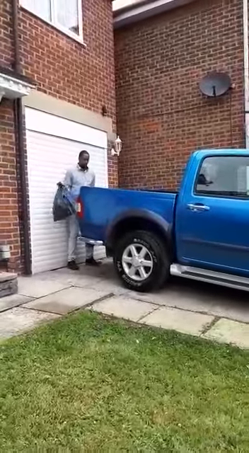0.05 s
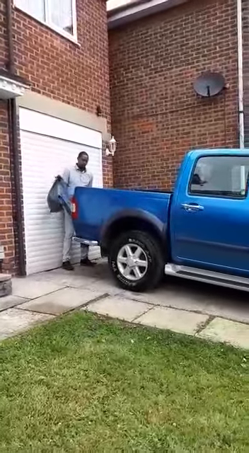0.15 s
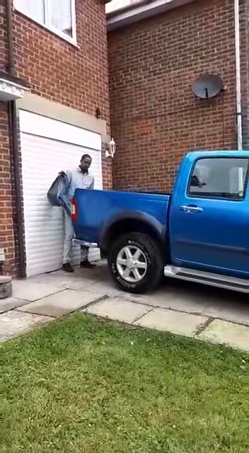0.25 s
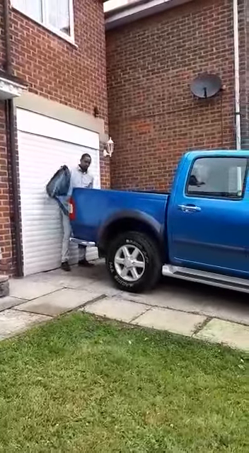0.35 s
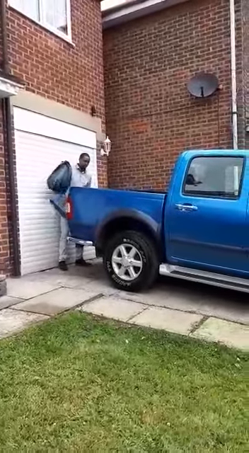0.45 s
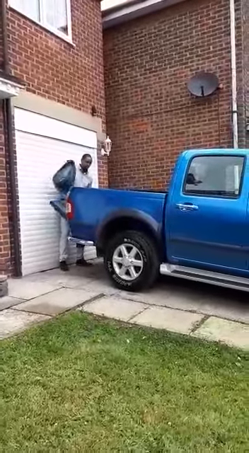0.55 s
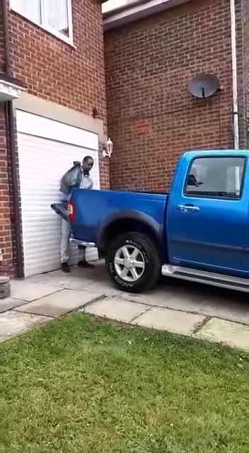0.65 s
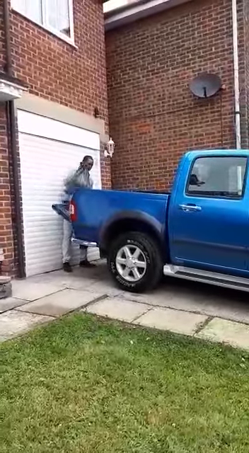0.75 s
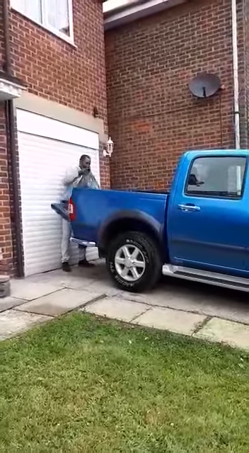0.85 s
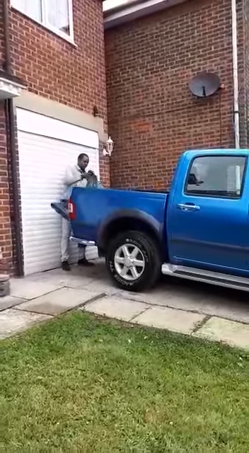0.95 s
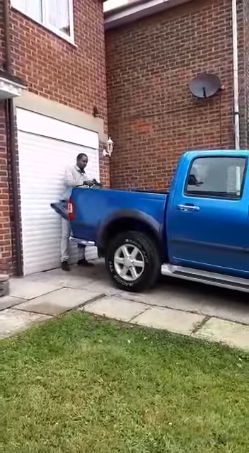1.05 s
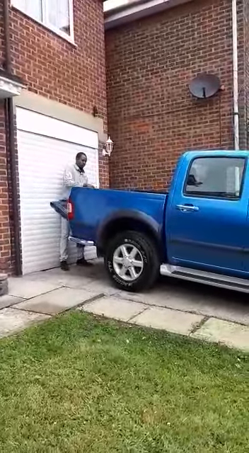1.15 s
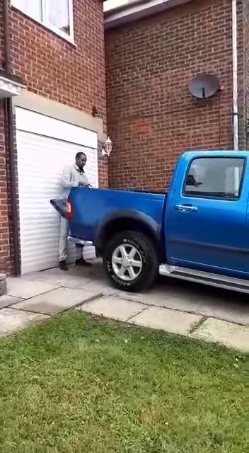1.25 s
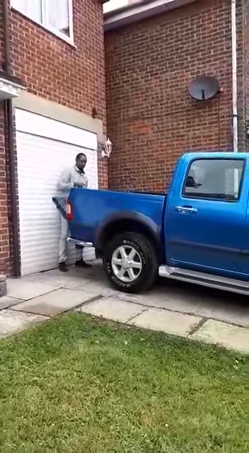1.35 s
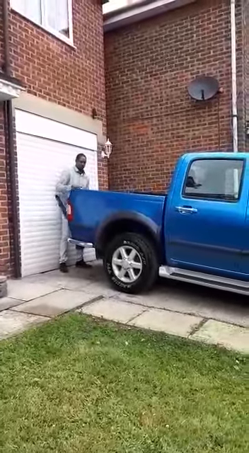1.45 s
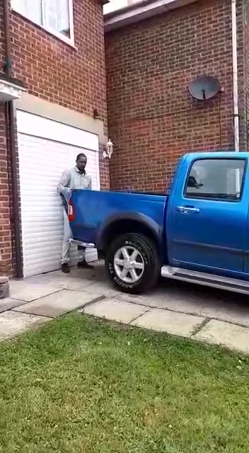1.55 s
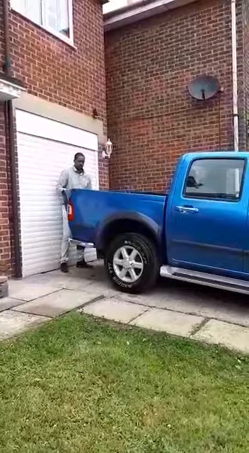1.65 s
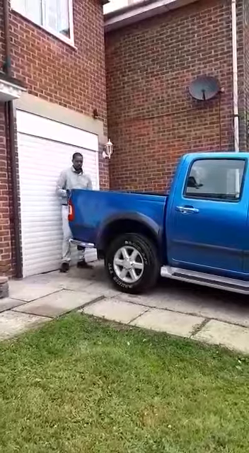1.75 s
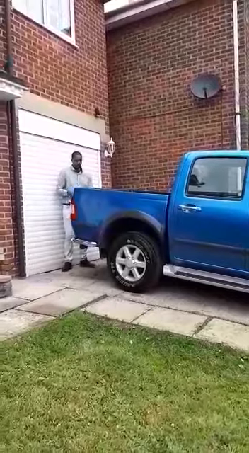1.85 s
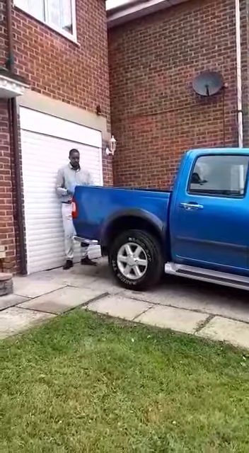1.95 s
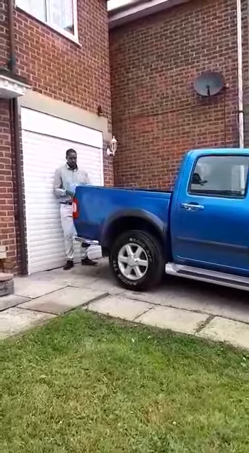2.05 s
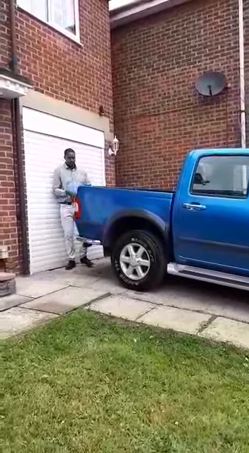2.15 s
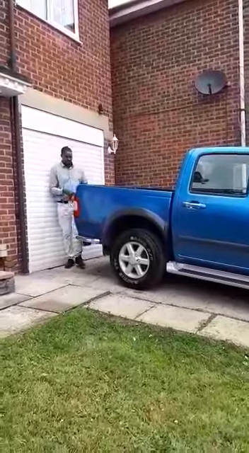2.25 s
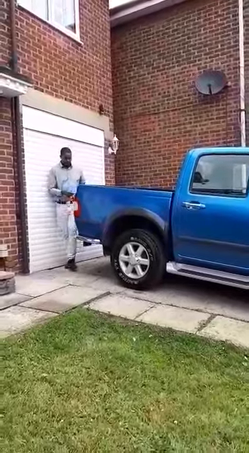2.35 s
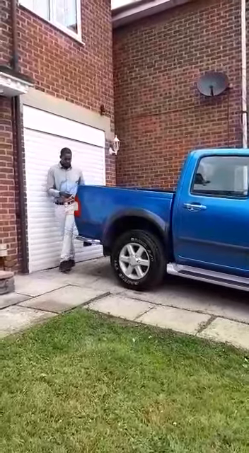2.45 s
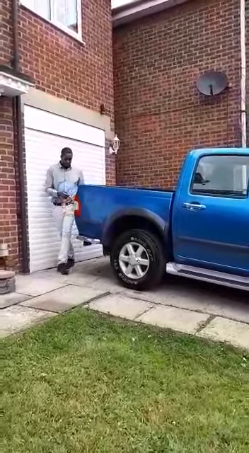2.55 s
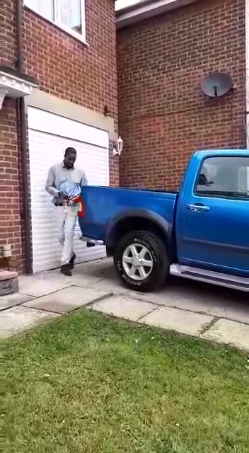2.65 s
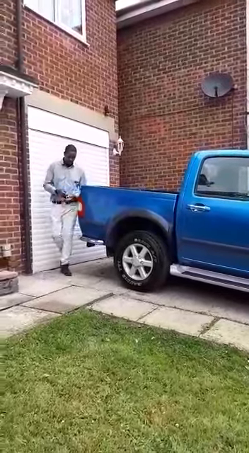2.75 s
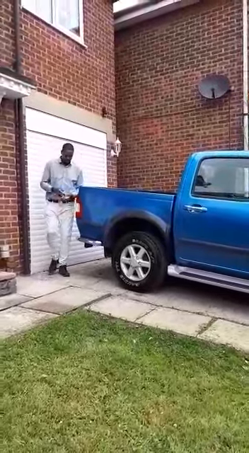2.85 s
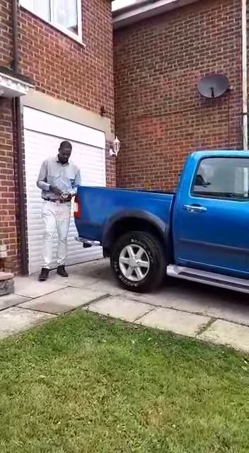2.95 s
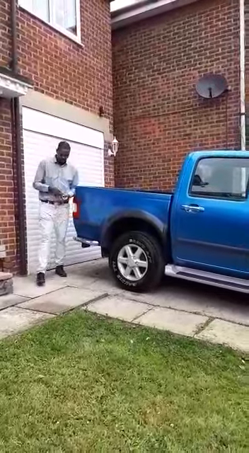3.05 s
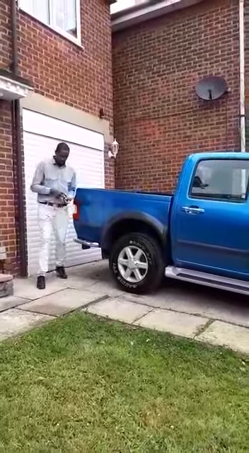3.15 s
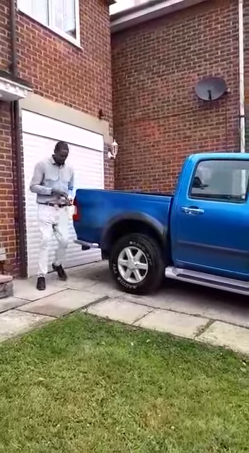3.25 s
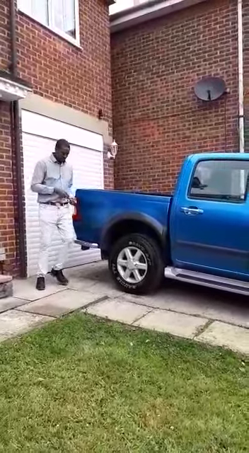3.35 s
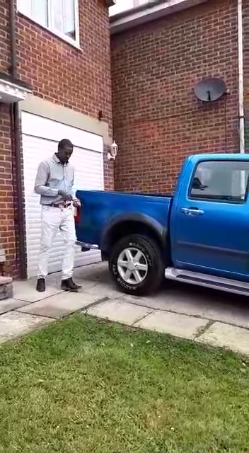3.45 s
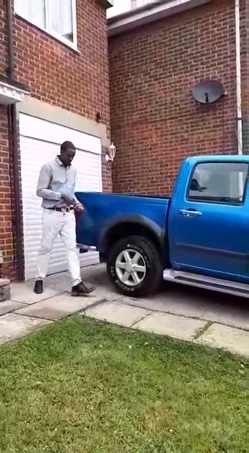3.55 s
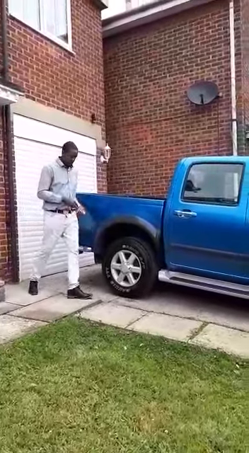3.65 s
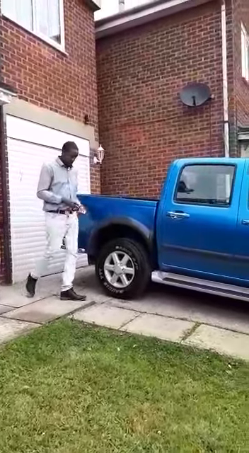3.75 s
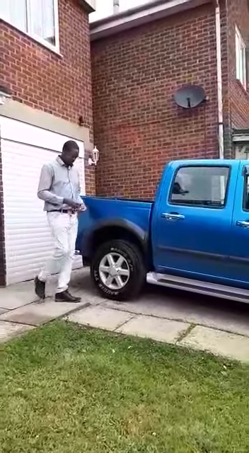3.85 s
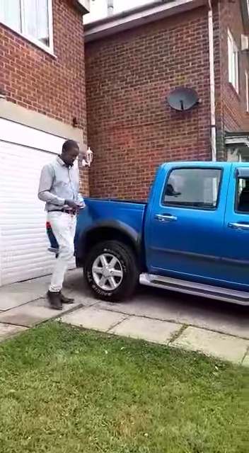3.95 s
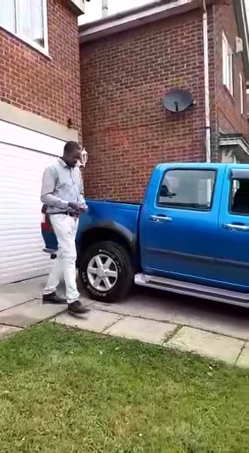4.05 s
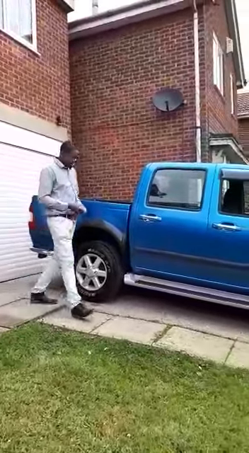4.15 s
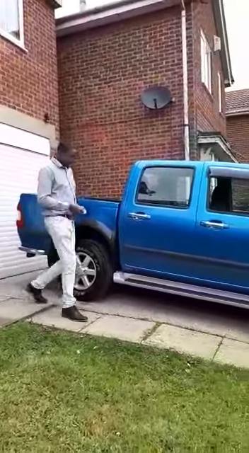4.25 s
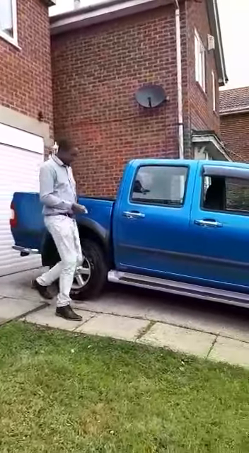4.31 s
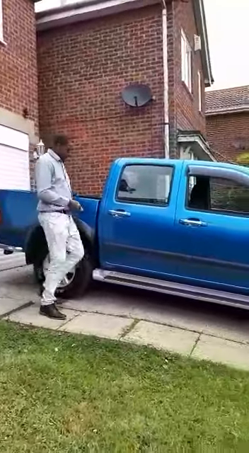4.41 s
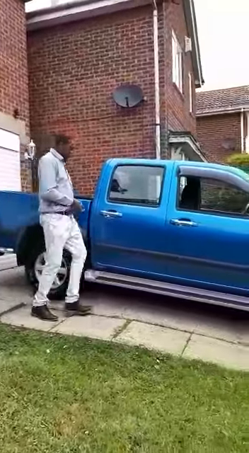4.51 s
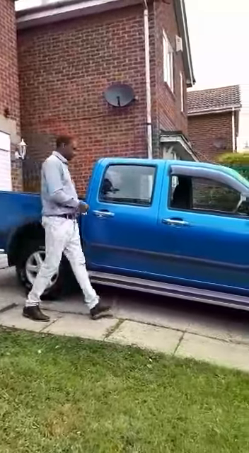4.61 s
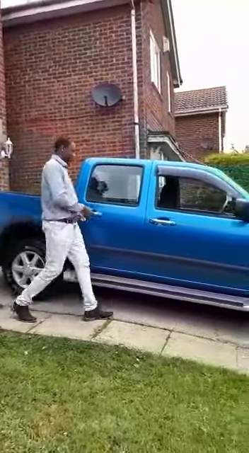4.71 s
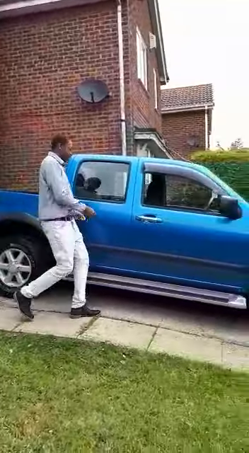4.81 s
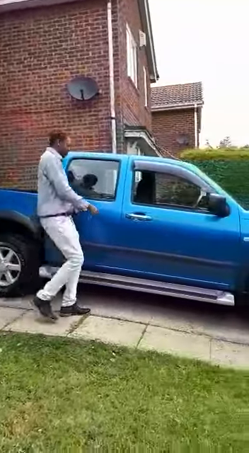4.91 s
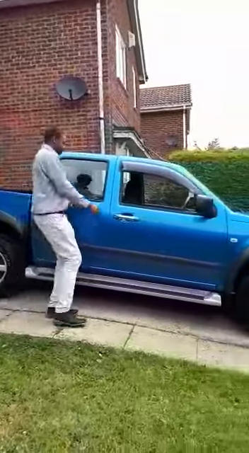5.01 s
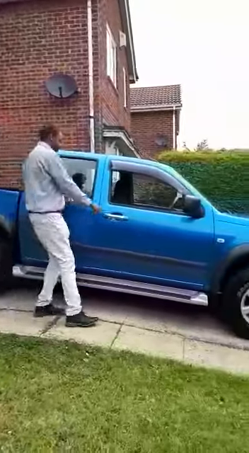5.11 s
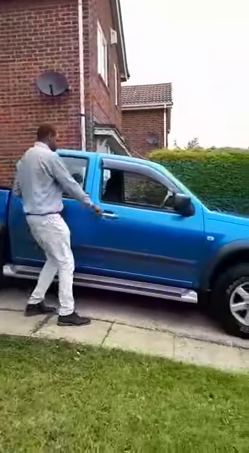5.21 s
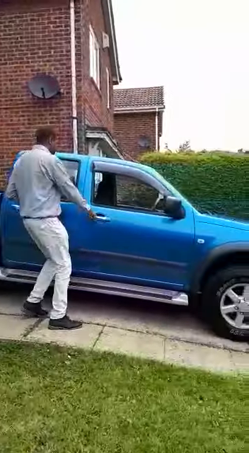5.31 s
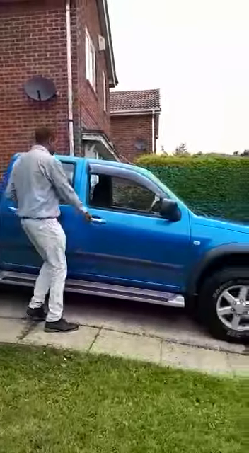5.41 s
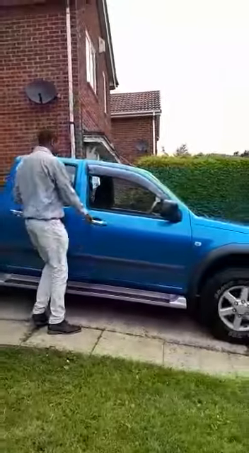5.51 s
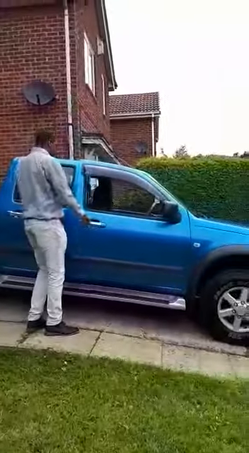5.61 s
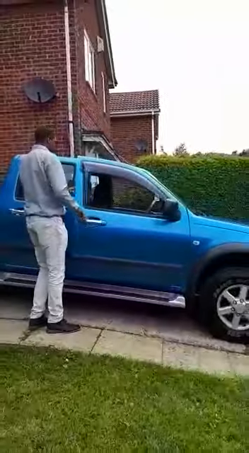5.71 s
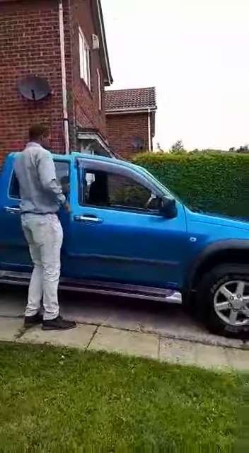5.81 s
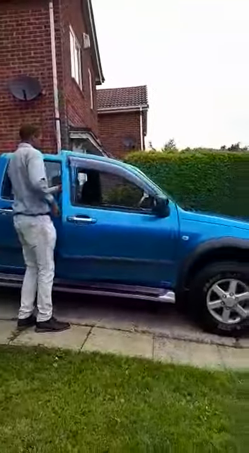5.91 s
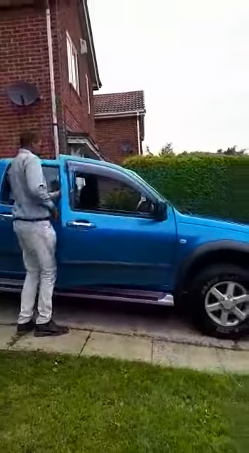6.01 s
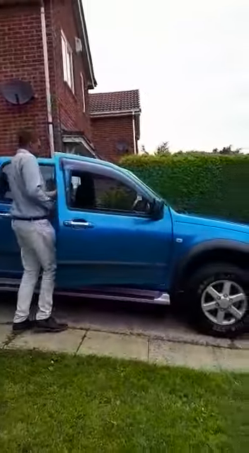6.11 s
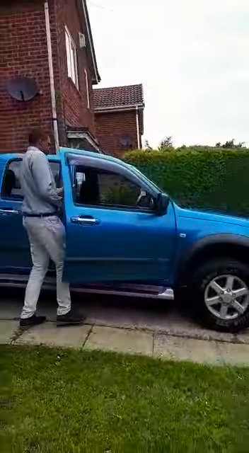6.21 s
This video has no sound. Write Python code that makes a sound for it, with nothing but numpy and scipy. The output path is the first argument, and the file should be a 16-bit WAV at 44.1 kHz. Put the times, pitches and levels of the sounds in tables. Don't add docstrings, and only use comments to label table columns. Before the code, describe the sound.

Crackling plastic and small metal knocks come first, followed by loose clanking straps and one heavy double-edged tailgate slam, by far the loudest sound, echoing briefly off brick. Quiet afterwards: light bright key jingles, gritty shoe scuffs, fluting bird whistles and a quick high trill. A heel taps stone, a sole creaks, and a vehicle door is unlatched with dull clunks. Distant road roar and faint leaves surround it, captured outdoors in stereo on a phone.

```python
import sys
import numpy as np
from scipy import signal
from scipy.fft import rfft, irfft
from scipy.io import wavfile
from scipy.ndimage import uniform_filter1d

SR = 44100
rng = np.random.default_rng(int(sys.argv[2]) if len(sys.argv) > 2 else 0)


def invert_db(x):
    u = np.asarray(x, float) / 20
    return 10 ** u


def to_wav(sig):
    pcm = np.clip(np.atleast_2d(sig), -1, 1) * 32767
    pcm = np.round(pcm).astype(np.int16)
    wavfile.write(sys.argv[1], SR, pcm.T)


N = 276507
TIME = np.arange(N) / SR
HZ = np.maximum(np.fft.rfftfreq(N, 1 / SR), 1)


def on_log(table, hz):
    f, v = np.transpose(table)
    return np.interp(np.log(hz), np.log(f), v)


def unit(x):
    return x / np.sqrt(np.mean(x ** 2))


def colour(x, gain):
    return irfft(rfft(x) * gain, N)


def band(hz, width):
    return 1 / np.sqrt(1 + ((HZ - hz ** 2 / HZ) / width) ** 2)


def ring(x, hz, t60):
    r = np.exp(-np.log(1000) / (t60 * SR))
    swing = signal.lfilter([1], [1, -r * np.exp(2j * np.pi * hz / SR)], x).imag
    return np.sqrt(2 * (1 - r * r)) * swing


# frequency_hz, correlation [0..1]
PORT_LIKENESS = [(100, 0.95), (400, 0.95), (800, 0.75), (1500, .5), (3000, 0.14), (6000, 0.027)]


def pair(noise):
    c = on_log(PORT_LIKENESS, HZ)
    mid = colour(noise[0], np.sqrt((1 + c) / 2))
    side = colour(noise[1], np.sqrt((1 - c) / 2))
    return np.array([mid + side, mid - side])


def walk(rate):
    k = int(SR / rate)
    held = np.repeat(rng.standard_normal(N // k + 1), k)
    return 1.3 * uniform_filter1d(uniform_filter1d(held, k), k)[:N]


def bursts(s, db, length, rise):
    out = np.zeros(N)
    for start_s, level_db, fade_s in zip(s, db, length):
        i = int(start_s * SR)
        t = np.arange(min(N - i, SR // 2)) / SR
        out[i:i + len(t)] += invert_db(level_db) * (1 - np.exp(-t / rise)) * np.exp(-t / fade_s)
    return out


def grit(scatter_db):
    return unit(rng.standard_normal((2, N)) * invert_db(scatter_db * rng.exponential(size=N)))


def steel(blows, modes, clank_colour, rattle_colour, boom_db, shake_s, rattle_db, rattle_slope, wobble=1.79):
    s, clank_db, low_db, thud_hz = np.transpose(blows)
    length = np.full(len(s), shake_s)
    high_db = rattle_db + rattle_slope * (clank_db + 24.5)
    boom = 0
    for hz, db, t60 in modes:
        near_db = -7.6 * np.log2(hz / thud_hz) ** 2
        push = bursts(s, low_db + db + near_db, 0.39 * length, rise=0.0014)
        keep = np.exp(-np.log(1000) / (t60 * SR))
        swing = signal.lfilter([1 - keep], [1, -keep], push)
        upset = wobble * walk(45) + .0006 * hz * np.array([walk(30), walk(30)])
        boom = boom + swing * np.sin(2 * np.pi * hz * TIME + upset)
    clank = unit(colour(pair(grit(0.69)), invert_db(on_log(clank_colour, HZ))))
    clank = clank * bursts(s, clank_db - 5.5, length, rise=0.00016)
    rattle = unit(colour(pair(grit(1.64)), invert_db(on_log(rattle_colour, HZ))))
    rattle = rattle * bursts(s, high_db + 1.5, 0.94 * length, rise=0.004)
    return thin_deep_bass(invert_db(boom_db) * boom + clank + rattle)


def thin_deep_bass(x):
    return colour(x, 1 / (1 + (62 / HZ) ** 4))


# start_s, clank_db, boom_db, thud_hz
SLAM_BLOWS = [(1.951, -15.5, -20.5, 226), (1.958, -10, -24, 428), (1.972, -15.5, -14, 272),
              (1.989, -17.5, -21.5, 296), (1.995, -16, -11.5, 230), (2.009, -11, -19, 216),
              (2.025, -26.5, -12, 226), (2.045, -17, -29, 161), (2.076, -26, -17, 286),
              (2.06, -24, -23.5, 480), (2.112, -22.5, -26, 240), (2.15, -30, -43, 170),
              (2.17, -32, -32, 220), (2.195, -32, -29.5, 198), (2.217, -36.5, -31.5, 163),
              (2.277, -43, -33.5, 415), (2.347, -63.5, -40, 151)]
# pitch_hz, level_db, t60_s
SLAM_MODES = [(82.6, 6, 0.15), (133.8, -1.5, .12), (170, -1, 0.119), (197.3, -3.5, 0.21),
              (234.5, -1.5, 0.074), (279.5, -6, 0.11), (324.8, -8.5, 0.033), (354.8, -5, 0.094),
              (427.4, -4, 0.086), (429.3, -5, .1), (490.6, -6, 0.126), (577, -3.5, 0.0723)]
# frequency_hz, level_db [dB per Hz]
SLAM_CLANK = [(380, -10.5), (650, -5), (748, -6), (783, -5.5), (854, -3.5), (944, -3.5), (1070, -2.5),
              (1410, -0.5), (1610, -4), (2320, -18), (2430, -8.5), (2840, -15.5), (3200, -15), (4160, -42),
              (7040, -120)]
# frequency_hz, level_db [dB per Hz]
RATTLE_COLOUR = [(1470, -5), (2500, 1), (2830, -31.5), (3330, 0), (3950, -8.5), (4440, -4.5), (4800, -2.5),
                 (5440, -7.5), (7360, -3.5), (8600, -17.5), (9580, -16), (13900, -13.5), (16000, -24)]


def gate_slam():
    return steel(SLAM_BLOWS, SLAM_MODES, SLAM_CLANK, RATTLE_COLOUR, boom_db=9.2,
                 shake_s=0.02, rattle_db=-36.5, rattle_slope=1.09)


def dull_rattle_db():
    return [(hz, db - 7 * (hz > 8000)) for hz, db in RATTLE_COLOUR]


# start_s, clank_db, boom_db, thud_hz
LIFT_BLOWS = [(0.01, -62, -43, 200), (0.134, -28, -35, 458), (0.152, -33, -29, 390),
              (0.168, -38, -29.5, 410), (0.409, -63, -38.5, 199), (0.465, -41, -38.5, 199),
              (1.18, -29, -29.5, 417), (1.19, -33, -33, 149.8), (1.202, -26.5, -30, 248),
              (1.238, -30.5, -30.5, 458), (1.266, -20.5, -33.5, 491), (1.273, -24.5, -34.5, 460),
              (1.279, -23.5, -29.5, 440), (1.286, -17.5, -22.5, 467), (1.294, -30.5, -35, 412),
              (1.321, -41.5, -31, 406), (1.365, -42, -33.5, 414), (1.422, -37.5, -46.5, 237),
              (1.487, -30, -41, 485), (1.51, -37.5, -53, 409)]
# pitch_hz, level_db, t60_s
HANGING_MODES = [(196, -4.5, 0.18), (207, -2, .1), (248, -1.5, 0.13), (303.6, -5.5, 0.06), (359, -7.5, .08),
                 (411, -2.5, 0.079), (457.4, -5.5, 0.05), (505.5, -8, .07), (569, -9, 0.078)]
# frequency_hz, level_db [dB per Hz]
STRAP_CLANK = [(380, -38.5), (650, -11.5), (889, 0.5), (996, -4.5), (1170, -1), (1350, -10), (1480, -0.5),
               (2140, -18), (2320, -6), (3200, -15), (4160, -27.5), (7040, -120)]


def gate_lift():
    return steel(LIFT_BLOWS, HANGING_MODES, STRAP_CLANK, dull_rattle_db(), boom_db=9.8,
                 shake_s=0.018, rattle_db=-34, rattle_slope=1.67)


# start_s, clank_db, boom_db, thud_hz
DOOR_BLOWS = [(4.124, -42, -39, 302), (4.275, -55, -45, 326), (5.232, -54, -46, 318.5),
              (5.420, -26.5, -34.5, 250), (5.451, -23.5, -34.5, 300), (5.470, -29.5, -27, 233),
              (5.500, -34, -60, 200), (5.537, -34, -39, 452), (5.777, -28, -51, 319),
              (5.7935, -24.5, -34, 333), (5.803, -37, -41, 148), (5.817, -36.5, -35, 148)]
# pitch_hz, level_db, t60_s
DOOR_PANEL_MODES = [(94, -8, 0.088), (149, 6.5, 0.14), (151, -3, 0.031), (200, -0.5, 0.13),
                    (274.8, -2, 0.1), (320.8, -4.5, 0.024), (399.6, -7.5, 0.037), (442, -4, 0.11)]
# frequency_hz, level_db [dB per Hz]
LATCH_CLANK = [(380, -4), (650, -6), (943, -6), (1110, -10), (1280, -3.5), (1500, -10.5), (1660, -5),
               (1810, -11), (2860, -17.5), (4000, -27.5), (5200, -37), (8800, -120)]
# frequency_hz, level_db [dB per Hz]
HANDLE_RATTLE = [(1760, -25), (3000, -3), (5630, -8), (6440, -11), (7670, -9), (8880, -27), (9940, -25),
                 (16000, -39.5)]


def door_latch():
    return steel(DOOR_BLOWS, DOOR_PANEL_MODES, LATCH_CLANK, HANDLE_RATTLE, boom_db=9.9,
                 shake_s=0.012, rattle_db=-52, rattle_slope=1.4, wobble=1.0)


# start_s, level_db, pitch_hz, held_s, fade_s
SWINGS = [
    (4.1247, -30, 302, 0.0044, 0.006),
    (4.125, -34.5, 523, .003, 0.0043),
    (4.277, -38, 328, .003, .005),
    (5.234, -38, 320, .004, .006),
    (5.453, -27.5, 154.6, 0.022, 0.0081),
    (5.453, -31, 317, .024, 0.0065),
    (5.794, -28, 410, 0.0066, .003),
    (5.8005, -26.5, 154, .024, 0.0046),
    (5.8007, -38, 146, .02, .04),
    (5.801, -35, 298, 0.018, .008),
]


def thumps():
    out, t = np.zeros(N), np.arange(SR // 5) / SR
    for s, db, hz, held, fade in SWINGS:
        shape = np.exp(-np.maximum(t - held, 0) / fade)
        out[int(s * SR):int(s * SR) + len(t)] += invert_db(db) * shape * np.sin(2 * np.pi * hz * t)
    return thin_deep_bass(out)


# start_s, level_db, centre_hz, length_s
SCUFF_EVENTS = [(0.093, -47, 12000, .03), (.098, -36.5, 7140, 0.0098), (0.113, -43.5, 2450, .018),
                (.208, -60.5, 2540, 0.025), (0.32, -44.5, 2700, 0.024), (0.36, -43, 2400, 0.014),
                (0.51, -57.5, 6460, 0.021), (0.954, -68.5, 7000, 0.16), (0.49, -55.5, 2340, 0.15),
                (1.798, -63.5, 4730, 0.028), (2.664, -59, 6960, .009), (3.048, -52.5, 5400, 0.019),
                (3.13, -43, 2240, 0.013), (3.121, -49, 4200, 0.0056), (3, -56, 1900, 0.0051),
                (3.224, -50, 9000, .004), (3.239, -52, 10000, .004), (3.158, -53, 9300, .004),
                (3.015, -58.5, 4200, .006), (3.4, -60, 12000, .005), (3.3155, -45, 5400, 0.004),
                (3.3155, -49, 12500, 0.004), (5.42, -56.5, 7000, 0.016), (3.577, -46, 2630, 0.006),
                (3.627, -49, 2400, .006), (4.124, -53, 2470, 0.019), (4.1245, -58, 7600, 0.014),
                (.467, -45, 10000, .0015), (.467, -47, 2500, .002), (.335, -49.5, 2450, 0.025),
                (.35, -50, 3300, 0.018), (.513, -57, 6500, .003)]


def scuffs():
    out, noise = np.zeros((2, N)), pair(grit(1.8))
    broad = unit(colour(noise, invert_db(on_log(dull_rattle_db(), HZ) - 0.0)))
    for s, db, hz, length in SCUFF_EVENTS:
        i = slice(int(s * SR), int(s * SR) + SR // 2)
        peak = signal.iirpeak(hz, 2.5, fs=SR)
        narrow = signal.lfilter(*peak, signal.lfilter(*peak, noise[:, i]))
        crackle = unit(narrow) + invert_db(-0.5) * broad[:, i]
        out[:, i] += bursts([s], [db], [length], rise=0.000415)[i] * crackle
    return out


# start_s, level_db, pitch_hz
TICK_EVENTS = [(.081, -23, 6570), (.467, -35, 7300), (.467, -31, 11700), (2.118, -42, 12200),
               (2.221, -46, 6000), (2.222, -45.5, 12000), (4.769, -58, 5200), (4.787, -45, 5200),
               (4.787, -31.5, 1750), (4.7937, -44, 5170), (4.7935, -36.5, 1870), (4.7928, -46, 2660),
               (4.802, -38, 1200), (4.794, -51, 7800), (5.423, -49, 7700), (5.453, -31, 1300),
               (5.795, -37, 1500), (5.795, -39, 3000), (5.7955, -35, 6500), (5.7955, -45, 7500),
               (5.7955, -50, 9800), (5.992, -40, 2150)]


def ticks():
    out, t = np.zeros((2, N)), np.arange(SR // 20) / SR
    for (s, db, hz), turn in zip(TICK_EVENTS, rng.standard_normal((len(TICK_EVENTS), 2, 1))):
        rise = 1 - np.exp(-(t / 0.00066) ** 2)
        fade = np.exp(-np.log(1000) * t * hz / 27.4)
        tick = 2 * invert_db(db) * rise * fade * np.sin(2 * np.pi * hz * t + .6 * turn)
        out[:, int(s * SR):int(s * SR) + len(t)] += tick
    return out


# start_s, level_db
SOLE_SLIPS = [
    (4.6623, -66.5),
    (4.6664, -60),
    (4.6702, -63),
    (4.6738, -60.5),
    (4.6768, -59.5),
    (4.6795, -58.5),
    (4.682, -56.5),
]


def creak():
    slips, (s, db) = np.zeros(N), np.transpose(SOLE_SLIPS)
    slips[(s * SR).astype(int)] = invert_db(db)
    low = 4.5 * band(2460, 1240) ** 2
    middle = 0.5 * band(5610, 900) ** 2 + 0.5 * band(7300, 1200) ** 2
    high = band(11800, 2480) ** 2 + 1.3 * band(15000, 1980) ** 2
    return 20 * colour(slips, low + middle + high)


# start_s, level_db, loudest_ring_hz
KEY_TOUCHES = [(1.5794, -64, 7700), (1.6144, -62, 7700), (1.6512, -60, 8060), (1.7255, -60, 8010),
               (1.7799, -58.5, 7050), (2.8828, -60, 7900), (2.9955, -61.5, 7530), (3.014, -58.5, 10950),
               (3.032, -64, 13500), (3.0499, -51.5, 11200), (3.0556, -43, 13300), (3.066, -52, 14200),
               (3.085, -55.5, 11200), (3.1142, -57.5, 7130), (3.159, -46.5, 14100), (3.164, -54, 11100),
               (3.2246, -47, 7230), (3.239, -54, 12200), (3.275, -65, 7200), (3.2993, -56.5, 5740),
               (3.3159, -55, 13500), (3.3597, -59, 4860), (3.3862, -60, 7220), (3.400, -63, 14000),
               (3.5443, -54.5, 7820), (3.5803, -50, 7330), (3.605, -56, 9600), (3.6197, -54, 11200),
               (3.6394, -49, 14160)]
# pitch_hz, level_db
BUNCH_RINGS = [(5100, -13.5), (7450, -1), (8050, -8), (9500, -17.5), (11100, -10.5), (12200, -7),
               (13300, -17), (14300, -6)]


def keys():
    out, size, chatter = np.zeros((2, N)), SR // 6, grit(2.75)
    chance = rng.standard_normal((len(KEY_TOUCHES), 2, len(BUNCH_RINGS) + 1))
    for (s, db, loud_hz), (detune, uneven) in zip(KEY_TOUCHES, chance):
        hz, rel_db = np.transpose(list(BUNCH_RINGS) + [(loud_hz, 5)])
        i = slice(int(s * SR), int(s * SR) + size)
        shake = chatter[:, i] * bursts([s], [db], [0.012], rise=0.00037)[i]
        for f, g in zip(hz * (1 + .006 * detune), rel_db + 3.0 * uneven):
            out[:, i] += invert_db(g - 6) * ring(shake, f, .035)
        out[:, i] += invert_db(-9.5) * signal.lfilter(*signal.iirpeak(9000, .9, fs=SR), shake)
    return out


# start_s, length_s, start_hz, end_hz, level_db
THRUSH_NOTES = [
    (2.282, .08, 2060, 1984, -55),
    (2.38, 0.047, 2007, 2040, -49.5),
    (2.541, 0.091, 2063, 2554, -47),
    (2.597, 0.097, 2520, 2440, -52),
    (2.756, 0.12, 2202, 1917, -48.5),
    (2.879, 0.17, 1876, 1625, -55),
    (3.092, 0.062, 1674, 1580, -51.5),
    (3.24, 0.18, 2621, 2570, -51.5),
    (3.468, 0.045, 3150, 2990, -57),
    (3.5, 0.03, 2850, 2680, -55),
]
# flutter_hz, lower_sideband_db
THROAT_FLUTTER = [
    (100, -6.5),
    (130, -8.5),
    (185, -5.5),
]


def thrush():
    out, waver = np.zeros(N), walk(45)
    for s, length, hz0, hz1, db in THRUSH_NOTES:
        flutter_hz, flutter_db = THROAT_FLUTTER[np.searchsorted([2070, 2550], (hz0 + hz1) / 2)]
        u = np.clip((TIME - s) / length, 0, 1)
        edge = np.clip(np.minimum(u, 1 - u) * length / 0.014, 0, 1)
        hz = hz0 + (hz1 - hz0) * u ** (0.48 if hz1 > hz0 else 1.22)
        phase = 2 * np.pi * np.cumsum(hz * (1 + .0035 * waver)) / SR
        flutter = 2 * np.pi * np.cumsum(flutter_hz * (1 + .2 * walk(60))) / SR
        sidebands = np.sin(phase - flutter) + 0.37 * np.sin(phase + flutter)
        voice = np.sin(phase) + invert_db(flutter_db + 2.2 * walk(40.2)) * sidebands
        out += edge * invert_db(db + 3 + 2.8 * walk(70)) * voice
    return out


def sweeps(rows, rise=0.586, fall=1):
    out = np.zeros(N)
    for s, length, hz0, hz1, db in rows:
        u = np.linspace(0, 1, int(length * SR))
        hz = hz0 * (hz1 / hz0) ** (u ** (rise if hz1 > hz0 else fall))
        glide = np.sin(np.pi * u) * np.sin(2 * np.pi * np.cumsum(hz) / SR)
        out[int(s * SR):int(s * SR) + len(u)] += invert_db(db) * glide
    return out


def phrase(start_s, period_s, length_s, start_hz, end_hz, levels_db):
    return [(start_s + k * period_s, length_s, start_hz, end_hz, db) for k, db in enumerate(levels_db)]


# start_s, length_s, start_hz, end_hz, level_db
FINCH_CHIRPS = [(3.568, .012, 5600, 7100, -53), (3.603, 0.065, 7300, 3700, -55),
                (3.645, 0.062, 7100, 3600, -55), (3.44, .03, 3900, 4900, -72),
                (3.45, .025, 5500, 7000, -75), (3.698, 0.018, 5100, 4300, -50),
                (3.707, 0.018, 7700, 6350, -64), (2.822, .07, 10040, 8900, -69)]
# start_s, length_s, start_hz, end_hz, level_db
LOWER_STROKES = [(4.225, .009, 4000, 3750, -66), (4.237, 0.03, 4800, 3700, -58),
                 (4.270, 0.025, 5100, 3410, -51.5), (4.299, .032, 4730, 3150, -59),
                 (4.343, .022, 3900, 3040, -60)]
# start_s, length_s, start_hz, end_hz, level_db
UPPER_STROKES = [(4.231, .007, 7500, 6900, -70), (4.252, .017, 8200, 6600, -65),
                 (4.279, .027, 8300, 5800, -55.5), (4.312, .016, 7600, 6600, -54),
                 (4.338, .02, 7400, 6450, -58), (4.365, .025, 6900, 5800, -64)]


def finch(count=7):
    low_db, high_db = np.array([[-52], [-56]]) + 4.4 * rng.standard_normal((2, count))
    low_trill = sweeps(phrase(3.784, .0203, .021, 4300, 7150, low_db), rise=0.22)
    high_trill = sweeps(phrase(3.785, .0205, .007, 6300, 8000, high_db))
    far = sweeps(list(FINCH_CHIRPS) + list(UPPER_STROKES)) + low_trill + high_trill
    near = sweeps(LOWER_STROKES, fall=0.504)
    return far, near


# frequency_hz, t60_s
ECHO_T60 = [(100, 0.59), (1000, 0.54), (8000, 0.12)]
# frequency_hz, level_db
ECHO_COLOUR = [(100, -8), (500, 2), (2000, -3), (6000, 9.5), (14000, -7)]


def yard(x):
    t, tail = np.arange(int(.7 * SR)) / SR, 0
    noise = pair(rng.standard_normal((2, N)))
    for hz in 60 * 2. ** np.arange(9):
        fade = invert_db(on_log(ECHO_COLOUR, hz)) * np.exp(-np.log(1000) * t / on_log(ECHO_T60, hz))
        tail = tail + colour(noise, band(hz, 0.71 * hz) ** 2)[:, :len(t)] * fade
    tail = tail * (t > .008)
    return signal.fftconvolve(x[:1], tail / np.sqrt(np.sum(tail ** 2) / 2), axes=1)[:, :N]


# peak_s, swell_s, level_db, fine_hiss_db [against the rustle]
RUSTLE_SWELLS = [(.2, 0.2, -55, -6.5), (.34, 0.095, -75, -33), (.56, .12, -63.5, -7),
                 (.9, 0.39, -73, -20.5), (1.22, .16, -66, -3.5), (1.3, .14, -58.5, 1.5),
                 (1.499, .2, -64.5, -16), (2.92, 0.073, -68.5, -9.5), (3.1, 0.11, -67, 1),
                 (3.18, 0.08, -66, -2), (3.24, 0.08, -66, -3), (3.33, 0.13, -67.5, -5), (3.4, .04, -70, -4),
                 (3.67, 0.12, -50, -23.5), (3.85, 0.134, -68, -26)]


def leaves():
    s, width, db, fine_db = np.transpose(RUSTLE_SWELLS)[:, :, None]
    shape = np.exp(-np.abs(TIME - s) / width * np.where(TIME < s, 1.6, 1) * 2)
    rustle_level = invert_db(-77.5) + np.sum(invert_db(db) * shape, 0)
    hiss_level = invert_db(-80) + np.sum(invert_db(db + fine_db) * shape, 0)
    rustle_gain = band(7240, 1500) + 0.56 * band(3560, 2474)
    rustle_gain = rustle_gain / (1 + (HZ / 8200) ** 24) / (1 + (2200 / HZ) ** 4)
    rustle = unit(colour(grit(1.45), rustle_gain))
    hiss = unit(colour(grit(1.2), band(11300, 7000) / (1 + (7900 / HZ) ** 12)))
    return rustle_level * rustle + invert_db(2.0) * hiss_level * hiss


# frequency_hz, level_db [dB per Hz]
TRAFFIC_COLOUR = [(15, -47), (25, -32.5), (48, -12), (152, -9), (275, -12), (313, -8), (412, -4.5),
                  (579, -6), (658, -7), (732, -3), (1030, 1.5), (1610, -8), (1940, -15.5), (2250, -20.5),
                  (4000, -47), (5200, -74.5), (8800, -120)]
# time_s, level_db
ROAD_LEVEL = [(0, -45), (.15, -40.5), (.6, -42), (1.0, -44.5), (1.6, -44.5), (2.9, -43), (4.2, -44.5),
              (5.0, -45.5), (6.27, -45.5)]


def traffic():
    noise, out = colour(pair(rng.standard_normal((2, N))), invert_db(on_log(TRAFFIC_COLOUR, HZ))), 0
    noise = noise / np.sqrt(np.mean(colour(noise, (HZ > 600) & (HZ < 1800)) ** 2))
    roar_db = np.interp(TIME, *np.transpose(ROAD_LEVEL))
    rumble_db = -37.5 - 0.65 * TIME
    for hz in 30 * 2 ** np.arange(0, 7.6, .5):
        share = np.clip(1 - np.abs(2 * np.log2(HZ / hz)), 0, 1)
        treble = np.clip(np.log2(hz / 200), 0, 1)
        db = treble * roar_db + (1 - treble) * rumble_db + 0.21 * walk(2.0) + 0.24 * walk(13)
        out = out + invert_db(db) * colour(noise, share)
    return out


def scene():
    gate = gate_lift() + gate_slam()
    door = door_latch() + thumps()
    scuff = scuffs() + ticks() + creak()
    jingle, song, (far, near) = keys(), thrush(), finch()
    song_echo = invert_db(-4) * song + invert_db(-1.5) * far + invert_db(-9) * near
    near_echo = invert_db(-12.5) * gate + invert_db(-14.5) * door + invert_db(-10.5) * scuff + invert_db(-14.5) * jingle
    echoes = yard(near_echo + song_echo)
    return gate + door + scuff + jingle + song + invert_db(-1.5) * far + near + echoes + leaves() + traffic()


def top_cut(x):
    return signal.sosfilt(signal.butter(12, 15900, fs=SR, output="sos"), x)


# frequency_hz, level_db
PORT_TILT = [(60, -0.5), (110, -1), (200, -1), (380, -2.5), (700, 2), (1290, -1.5), (2380, -7.5),
             (4400, 1.5), (8120, 0), (15000, -1.5)]


def record(dry):
    tilt = on_log(PORT_TILT, HZ) / 2
    ports = np.array([colour(dry[0], invert_db(tilt)), colour(dry[1], invert_db(-tilt))])
    rounded = np.tanh(0.76 * ports) / 0.87
    mix = colour(rounded, 1 / np.sqrt(1 + (45 / HZ) ** 4))
    return top_cut(mix)


dry = scene()
out = record(dry)
to_wav(out)
```